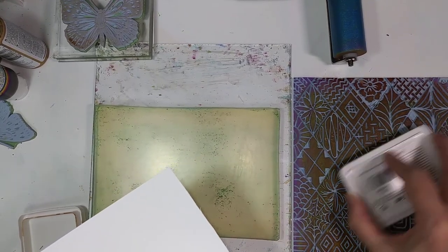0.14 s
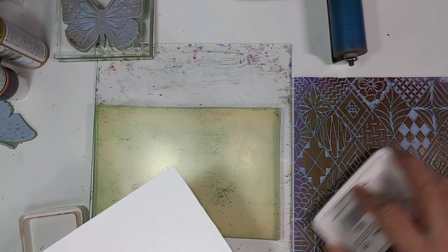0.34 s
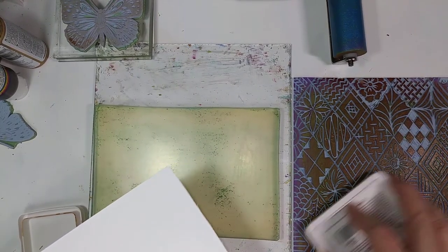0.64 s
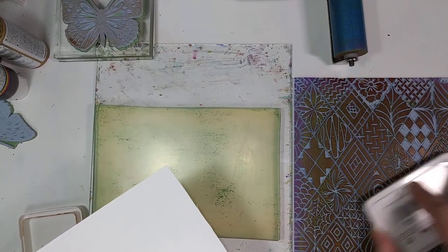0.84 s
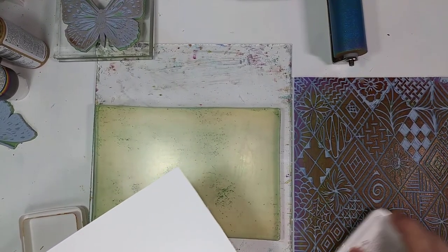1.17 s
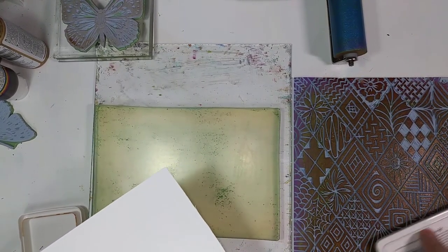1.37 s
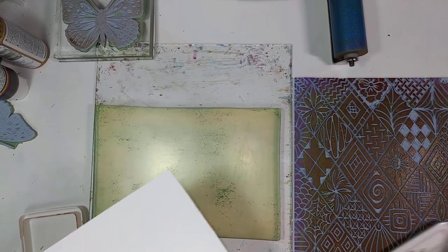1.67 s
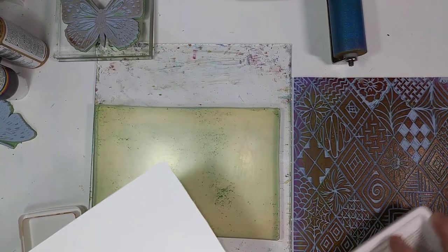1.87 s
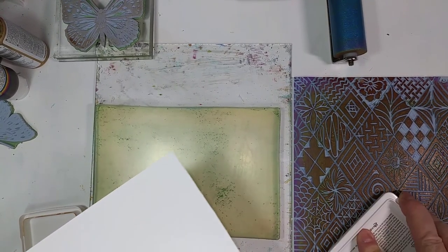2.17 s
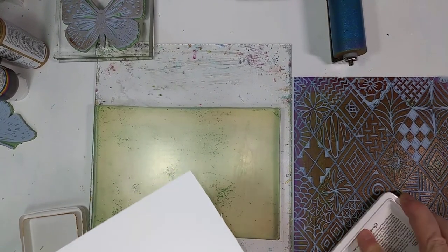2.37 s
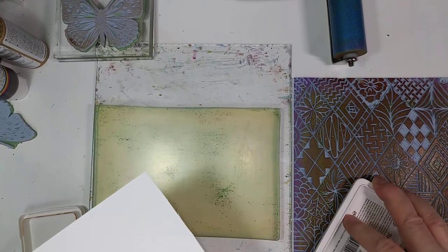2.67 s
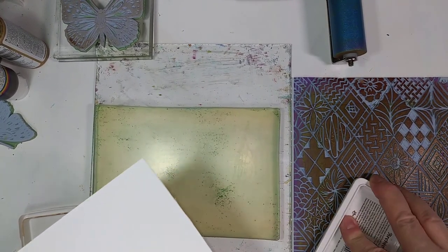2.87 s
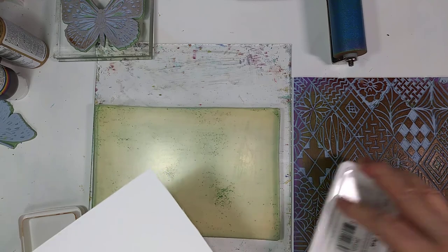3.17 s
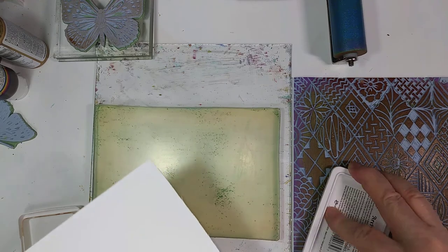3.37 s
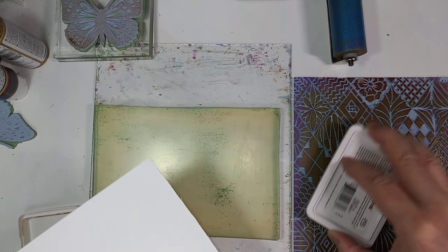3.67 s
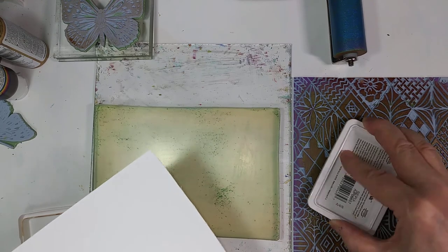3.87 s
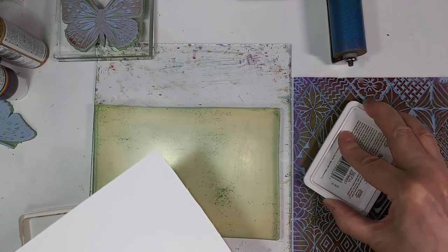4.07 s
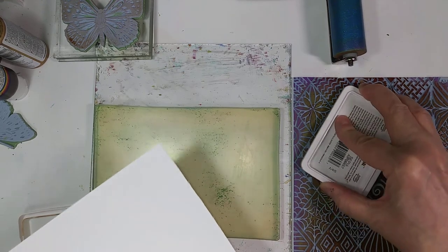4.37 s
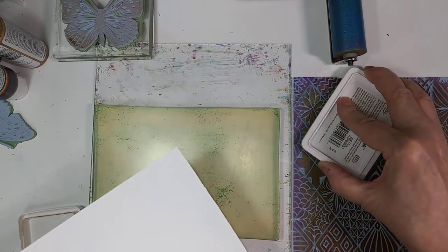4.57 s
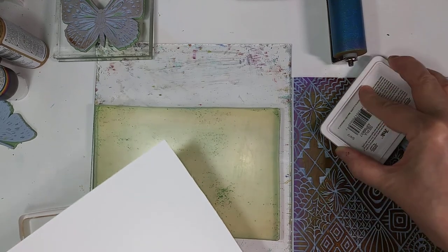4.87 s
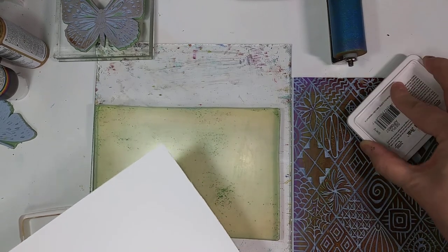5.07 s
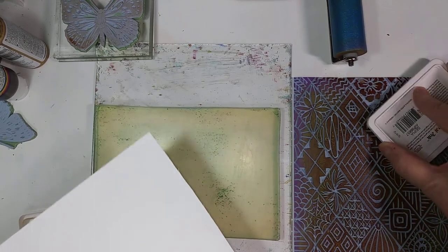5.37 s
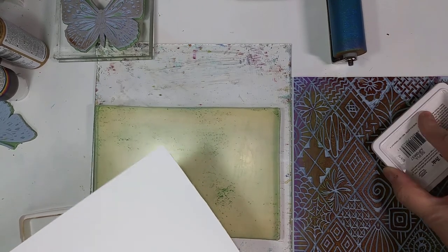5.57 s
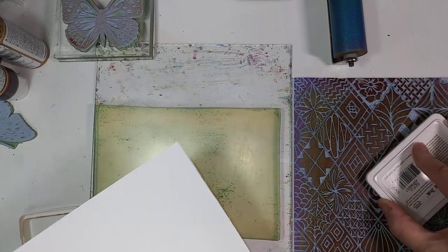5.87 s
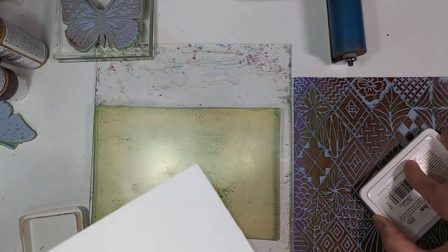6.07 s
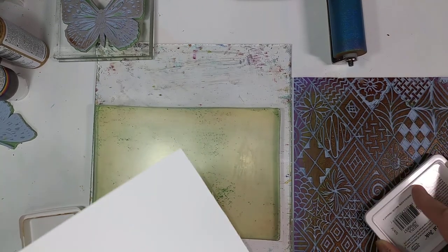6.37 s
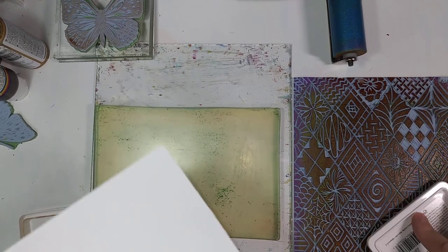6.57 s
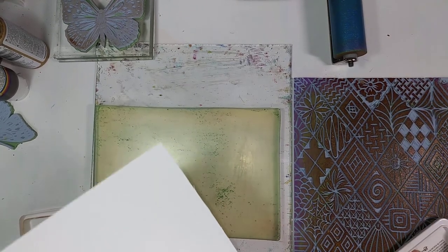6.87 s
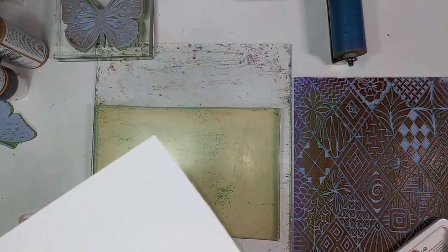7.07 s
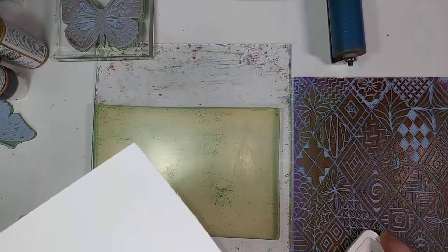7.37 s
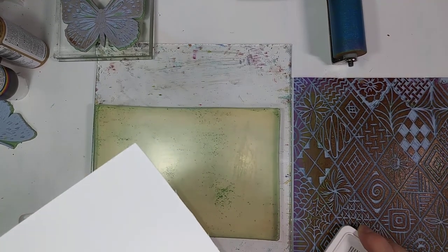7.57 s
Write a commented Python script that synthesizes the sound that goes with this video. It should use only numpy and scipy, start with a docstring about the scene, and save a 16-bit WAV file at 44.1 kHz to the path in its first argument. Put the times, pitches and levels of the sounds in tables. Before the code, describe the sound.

In a small, quiet room, a microphone above a table picks up the brisk, scratchy rubbing of an ink pad across ridged rubber. The rubbing stops and about nineteen dabs follow, spaced out at first, then quick and even, easing off near the end. Each one combines a dull table thump, a hollow knock and a click from the plastic case, with faint rattles in between.

```python
"""A small room, the microphone above a table. A plastic-cased ink pad is scrubbed back and forth
over a patterned rubber plate, then dabbed on it nineteen times. The felt hisses over the ridges
and the case rumbles; each dab thumps the table, knocks the hollow case and clicks its rim.
The room answers, over a soft background hush that sinks briefly before most of the dabs."""
import sys
import numpy as np
from scipy import signal
from scipy.fft import rfft, irfft, next_fast_len
from scipy.io import wavfile
from scipy.ndimage import uniform_filter1d

SR = 44100
rng = np.random.default_rng(int(sys.argv[2]) if len(sys.argv) > 2 else 0)


def transcribe(signal):
    """Save signal, clipped to [-1, 1], as a 16-bit WAV file at the path in sys.argv[1]."""
    frames = np.atleast_2d(signal).T
    limited = np.clip(frames, -1, 1)
    pcm = np.round(limited * 32767).astype(np.int16)
    wavfile.write(sys.argv[1], SR, pcm)


N = 340893
TIME = np.arange(N) / SR
KNOCK_TIME = np.arange(SR // 10) / SR

# dabs of the pad: t/s, table level/dB, hollow level/dB, shell level/dB, tick level/dB, hollow tilt/dB,
# lead of the first edge/s, gain of that edge/dB, lull before it/s
DABS = [(2.017, -29, -30.5, -20.5, -34.5, -8.5, 0.0031, -24.5, 0.015),
        (2.6783, -30, -27, -27.5, -32.5, -6, 0.0005, -22, .11),
        (3.2502, -33, -34.5, -32.5, -41.5, -9, 0.0015, 8, 0.18),
        (3.577, -31.5, -29, -27, -37.5, -9, 0.0043, -13, 0.08),
        (3.783, -23.5, -23.5, -19, -33.5, 4, 0.0037, -3.5, 0),
        (4.0409, -29, -31.5, -32.5, -45, 1, 0.005, 5, 0.049),
        (4.305, -29.5, -25.5, -28, -43.5, -3, 0.0069, -9, 0.029),
        (4.5707, -36.5, -34.5, -39.5, -50, 22, 0.0052, 1, 0.057),
        (4.8019, -35.5, -29, -36.5, -45.5, -2.5, .009, -20, 0.024),
        (5.0463, -34.5, -25, -34.5, -41.5, -0.5, .0088, -11, 0.043),
        (5.292, -31.5, -21.5, -30, -34.5, -0.5, 0.013, -21, 0.015),
        (5.5534, -38, -24, -28, -35.5, 3, 0.0043, -22, .04),
        (5.811, -28, -22, -23, -27, 31, 0.0053, -33, 0),
        (6.0432, -38, -31, -31, -43, 20, 0.0049, -17, 0.044),
        (6.2845, -25, -28.5, -15, -26, -15, 0.004, -7, 0.00068),
        (6.536, -23.5, -20, -13, -29.5, 2, 0.0033, -16, 0),
        (6.836, -29.5, -36, -28, -32.5, 22, 0.0017, -3, 0.073),
        (7.339, -29.5, -30.5, -31.5, -38.5, 1.5, 0.0023, 3.5, 0.092),
        (7.5974, -32, -21.5, -29, -49.5, -18.5, .0046, -7, 0.023)]
# modes of the case (its air space, its shell, its rim, its highest tick): f/Hz, gain/dB
HOLLOW_MODES = [(382, 1), (485, 0.029)]
SHELL_MODES = [(675, -2.5), (810, -0.4), (1000, 0.4)]
RIM_MODES = [(1400, -5.5), (1620, -1.5), (1900, 1.5), (2380, 2.5), (2950, 4.5), (3450, 4)]
TICK_MODES = [(4150, 9), (5200, 19.5), (5750, 14.5), (7000, 9.5), (9600, -10.5), (12500, -34)]


def undb(db):
    """Decibels to gain."""
    return 10 ** (np.asarray(db) / 20)


def unit(x):
    """Scale to rms 1."""
    return x / np.sqrt(np.mean(x ** 2))


def add(out, at_s, x):
    """Mix x into out at the given time."""
    i = int(at_s * SR)
    out[i:i + len(x)] += x[:len(out) - i]


def band(x, low_hz, high_hz, order=2):
    """Keep the range between two frequencies."""
    sos = signal.butter(order, [low_hz, min(high_hz, SR / 2.2)], "band", fs=SR, output="sos")
    return signal.sosfilt(sos, x + 1e-18)


def colour(x, points):
    """Shape x by a spectrum of (f/Hz, gain/dB) points."""
    hz, db = np.transpose(points)
    size = next_fast_len(N)
    bins_hz = np.maximum(np.fft.rfftfreq(size, 1 / SR), 1)
    gain = undb(np.interp(np.log(bins_hz), np.log(hz), db))
    return irfft(rfft(x, size) * gain, size)[:N]


def wander(rate_hz):
    """Smooth random wander of spread near 1."""
    return np.interp(TIME * rate_hz, np.arange(4096), rng.standard_normal(4096))


def resonate(force, modes):
    """Continuous force through (f/Hz, width/Hz, gain/dB) resonances, at rms 1."""
    return unit(sum(undb(db) * signal.lfilter(*signal.iirpeak(hz, hz / width, fs=SR), force)
                    for hz, width, db in modes))


def slips(grain_db, flutter_db):
    """Dense slips of felt fibres, bunched as the pad crosses the ridges of the pattern."""
    return rng.standard_normal(N) * undb(grain_db * rng.standard_normal(N) + flutter_db * wander(140))


def sliding(power, inertia_s=0.035):
    """Rubbing gain: a power of the hand's speed, which rises and falls as half a sine in each stroke."""
    # strokes from rest to rest: t/s, length/s, level at full speed/dB
    strokes = [(-.04, 0.18, -41), (0.134, 0.2, -41.5), (0.315, 0.21, -39), (0.512, 0.26, -41.5),
               (0.754, 0.18, -38.5), (0.921, 0.25, -41), (1.166, 0.22, -40.5), (1.368, 0.24, -42.5),
               (1.593, 0.18, -42), (1.783, 0.081, -52.5), (2.873, 0.13, -57.5)]
    gain = np.zeros(N)
    for start_s, length_s, db in strokes:
        speed = np.abs(np.sin(np.pi * np.clip((TIME - start_s) / length_s, 0, 1)))
        gain += undb(db) * speed ** power
    return uniform_filter1d(gain, size=int(inertia_s * SR))


def scrub(rumble_db=-11):
    """Each stroke swells with the speed of the hand: fibres hiss and the case rumbles."""
    # spectrum of the rubbing felt: f/Hz, gain/dB
    felt_spectrum = [(710, -40), (1200, -23), (1380, -40), (1570, -6), (1780, -7.5), (2680, -3),
                     (2980, 2.5), (3770, -5.5), (4670, -5.5), (5550, 2.5), (6510, -7.5), (7170, -7),
                     (10100, -17), (11900, -25), (15500, -32)]
    # case and plate under the sliding felt: f/Hz, width/Hz, gain/dB
    drag_modes = [(130, 430, -12), (353, 16, -7), (485, 220, 8), (716, 245, 12.5), (976, 76, 17),
                  (1530, 330, -1), (3050, 300, 1)]
    hiss = unit(colour(slips(grain_db=3, flutter_db=-1.0), felt_spectrum))
    rumble = resonate(slips(grain_db=4, flutter_db=2.0), drag_modes)
    return sliding(power=1.83) * hiss + undb(rumble_db) * sliding(power=0.96) * rumble


def case_drone(inertia_s=0.027, fade_s=0.06):
    """The case drones while the first strokes bear down on it, smoothed by the inertia of the hand."""
    # course of the drone: t/s, level/dB
    course = [(0, -56.5), (.2, -56), (.45, -50), (0.601, -55.5), (.8, -70)]
    # resonances of the pressed case: f/Hz, width/Hz, gain/dB
    drone_modes = [(326, 19, 9), (1010, 130, 3.5), (1544, 130, 3.5)]
    times, db = np.transpose(course)
    smooth_db = uniform_filter1d(np.interp(TIME, times, db), size=int(inertia_s * SR))
    fade = np.interp(TIME, [times[-1], times[-1] + fade_s], [1, 0])
    return undb(smooth_db) * fade * resonate(rng.standard_normal(N), drone_modes)


def hush(level_db=-56, waver_db=0.4, sink_db_per_s=400, deepest_db=16, return_s=0.0054):
    """Room tone that wavers slightly; it dips after the scrubbing and sinks just before most dabs."""
    # spectrum of the room tone: f/Hz, gain/dB
    hush_spectrum = [(25, -29), (55, -1), (130, 2), (320, -1), (550, -3), (1000, -7), (1400, -10.5),
                     (3000, -14.5), (5800, -17), (8000, -25.5), (12000, -29.5), (16000, -31.5)]
    dip_at_s, dip_length_s, dip_db = 1.912, 0.085, 10
    dip = np.exp(-(2 * (TIME - dip_at_s) / dip_length_s) ** 2)
    db = level_db + waver_db * wander(2.3) - dip_db * dip
    for at_s, *_, lead_s, _, lull_s in DABS:
        touch_s = at_s - lead_s
        sunk_db = np.clip(sink_db_per_s * (TIME - touch_s + lull_s), 0, deepest_db)
        db -= sunk_db * np.clip((touch_s - TIME) / return_s, 0, 1)  # snaps back as the pad touches
    return undb(db) * unit(colour(rng.standard_normal(N), hush_spectrum))


def room(x, gap_s=0.006, build_s=0.00072):
    """Two near echoes and countless reflections, whose energy builds and dies away as noise by band."""
    # diffuse decay of the room: low f/Hz, high f/Hz, t60/s, gain/dB
    decay_bands = [(46.6, 92, 0.5, -3.5), (122, 194.6, 0.45, -5.5), (204, 320, 0.21, -6.5),
                   (294, 656, 0.22, -10), (580, 1075, 0.26, -10), (1320, 2150, 0.29, -7.5),
                   (2147, 4120, 0.28, -12), (3860, 6230, 0.31, -15.5), (6850, 7700, 0.34, -18),
                   (8430, 11000, 0.43, -10.5)]
    # reflections from the table and things near it: delay/s, gain
    echoes = [(.0073, 0.11), (0.011, 0.064)]
    out = np.zeros(N)
    for low_hz, high_hz, t60, db in decay_bands:
        energy = band(x, low_hz, high_hz) ** 2
        for time_s in (build_s, t60 / np.log(10 ** 6)):
            pole = np.exp(-1 / (time_s * SR))
            energy = signal.lfilter([1 - pole], [1, -pole], energy)
        diffuse = unit(band(rng.standard_normal(N), low_hz, high_hz, order=3))
        add(out, gap_s, undb(db) * np.sqrt(energy) * diffuse)
    for delay_s, gain in echoes:
        add(out, delay_s, gain * uniform_filter1d(x, size=5))
    return out


def ring(force, modes, db, tilt_db=0, life_cycles=24, detune=0.059, knock_s=0.015):
    """Lossy modes of plastic on rubber; the point of contact tilts the highest against the lowest."""
    hz, mode_db = np.transpose(modes)[:, :, None]
    pitch_luck, level_luck = rng.standard_normal((2, len(hz), 1))  # the grip changes every time
    gain = undb(mode_db + tilt_db * np.linspace(0, 1, len(hz))[:, None] + 1.42 * level_luck)
    gain[1::2] *= -1  # neighbouring modes start opposed, so the knock takes a moment to build
    cycles = hz * (1 + detune * pitch_luck) * KNOCK_TIME
    decay = np.exp(-np.log(1000) * cycles / life_cycles)
    response = np.sum(gain * np.sin(2 * np.pi * cycles) * decay, axis=0)
    motion = signal.fftconvolve(force, response)[:len(KNOCK_TIME)]
    # a small part radiates little outside the range of its modes
    sound = band(motion, 0.66 * hz.min(), 1.5 * hz.max())
    return sound * undb(db) * np.sqrt(knock_s * SR / np.sum(sound ** 2))  # db is the level over knock_s


def push(contact_s):
    """The smooth force of a cushioned contact."""
    return KNOCK_TIME * np.exp(-KNOCK_TIME / contact_s)


def chatter(fade_s, rise_s=0.00026):
    """Many tiny contacts as hard plastic meets the ridges."""
    envelope = np.exp(-KNOCK_TIME / fade_s) * (1 - np.exp(-KNOCK_TIME / rise_s))
    return rng.standard_normal(len(KNOCK_TIME)) * envelope


def first_edge(hollow_db, shell_db, rim_db, tick_db, tilt_db, soft_shell_db=-14, soft_click_db=-6.5):
    """A cushioned touch of one edge: mostly the hollow of the case, with little shell and click."""
    hollow = ring(push(0.00036), HOLLOW_MODES, hollow_db, tilt_db, life_cycles=11)
    shell = ring(push(0.0008), SHELL_MODES, shell_db + soft_shell_db)
    click = ring(chatter(0.0022), RIM_MODES, rim_db) + ring(chatter(0.0013), TICK_MODES, tick_db)
    return hollow + shell + undb(soft_click_db) * click


def landing(contact_s, chatter_s, roughness=0.65):
    """A cushioned push, followed by uneven contacts as the pad settles on the ridges."""
    smooth, uneven = push(contact_s), chatter(chatter_s)
    return smooth / smooth.sum() + roughness * uneven / np.linalg.norm(uneven)


def table_thump(db, strength_db, boom_db=-15):
    """The table thumps over a deep boom; a stronger dab favours its upper modes."""
    # modes of the table top: f/Hz, gain/dB
    table_modes = [(140, 7), (178, 5.5), (250, 7.5)]
    thump = ring(push(0.000069), table_modes, db, tilt_db=1 + 0.49 * strength_db, life_cycles=13)
    boom = ring(push(0.00092), [(70, 0)], db + boom_db, life_cycles=2.8)
    return thump + boom


def case_knock(hollow_db, shell_db, tilt_db, chatter_s=0.003):
    """The flat landing knocks the air space and the shell of the case."""
    hollow = ring(landing(0.000071, chatter_s), HOLLOW_MODES, hollow_db, tilt_db, life_cycles=12.2)
    shell = ring(landing(0.0001, chatter_s), SHELL_MODES, shell_db, tilt_db=-0.5)
    return hollow + shell


def rim_click(rim_db, tick_db):
    """The rim chatters on the ridges; a harder contact favours its upper modes."""
    rim = ring(chatter(0.0033), RIM_MODES, rim_db, tilt_db=0.51 * (tick_db - rim_db))
    return rim + ring(chatter(0.003), TICK_MODES, tick_db)


def dabs(settle_s=0.00042, usual_db=-30.5):
    """One edge touches, then the pad lands flat. Returns the direct sound and what goes into the room."""
    direct, to_room = np.zeros((2, N))
    for at_s, table_db, hollow_db, shell_db, tick_db, tilt_db, lead_s, edge_db, _ in DABS:
        rim_db = 0.38 + shell_db + 0.57 * (tick_db - shell_db)  # between shell and tick in level
        thump = table_thump(table_db, strength_db=shell_db - usual_db)
        knock = case_knock(hollow_db, shell_db, tilt_db)
        click = rim_click(rim_db, tick_db)
        edge = undb(edge_db) * first_edge(hollow_db, shell_db, rim_db, tick_db, tilt_db)
        room_db = 2.5 - 0.53 * ((hollow_db + shell_db) / 2 - usual_db)  # stronger knocks sound drier
        for early_s, sound in [(lead_s, edge), (settle_s, -(thump + knock)), (0, click)]:
            add(direct, at_s - early_s, sound)
            add(to_room, at_s - early_s, undb(room_db) * sound)
    return direct, to_room


def nudges(contact_s=0.0018, shell_db=-5, tick_db=-6):
    """The case rocks and ticks a little in the hand, and bounces once more after two of the dabs, each time
    with a brief contact."""
    # rattles of the case in the fingers, and second bounces of the dabs at 6.836 s and 7.339 s (rows 6.847 and
    # 7.353): t/s, knock level/dB, click level/dB
    rattles = [(2.291, -52, -65), (2.407, -69, -67), (2.499, -74, -59.5), (4.402, -56, -54),
               (4.842, -49, -53.5), (5.184, -51.5, -64), (5.746, -48.5, -62), (5.756, -47, -57),
               (5.923, -49, -64), (6.136, -50, -59), (6.477, -54, -68.5), (6.55, -34, -38.5),
               (6.847, -47, -44), (7.353, -30, -41.5)]
    out = np.zeros(N)
    for at_s, knock_db, click_db in rattles:
        hollow = ring(chatter(contact_s), HOLLOW_MODES, knock_db)
        shell = ring(chatter(2 * contact_s), SHELL_MODES, knock_db + shell_db)
        rim = ring(chatter(contact_s), RIM_MODES, click_db)
        tick = ring(chatter(contact_s), TICK_MODES, click_db + tick_db)
        add(out, at_s, hollow + shell + rim + tick)
    return out


def scene(handling_room_db=-9):
    """Scrubbing and dabbing in the small room, heard in mono from above the table."""
    direct, to_room = dabs()
    handling = scrub() + case_drone() + nudges()
    reflections = room(to_room + undb(handling_room_db) * handling)
    return (direct + handling + reflections + hush())[None]


def record(dry, low_hz=45, top_hz=15850):
    """The microphone loses the deepest bass and rounds the loudest peaks; the top is cut."""
    thin = signal.sosfilt(signal.butter(3, low_hz, "high", fs=SR, output="sos"), dry)
    rounded = np.tanh(thin)
    return signal.sosfilt(signal.ellip(10, .1, 70, top_hz, fs=SR, output="sos"), rounded)


dry = scene()
out = record(dry)
transcribe(out)
```